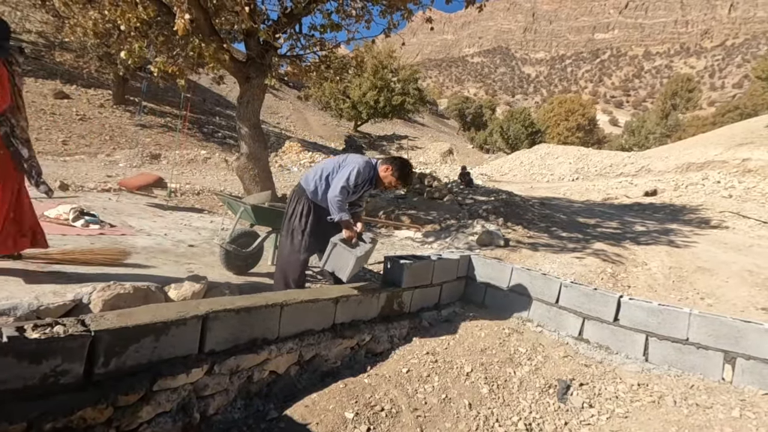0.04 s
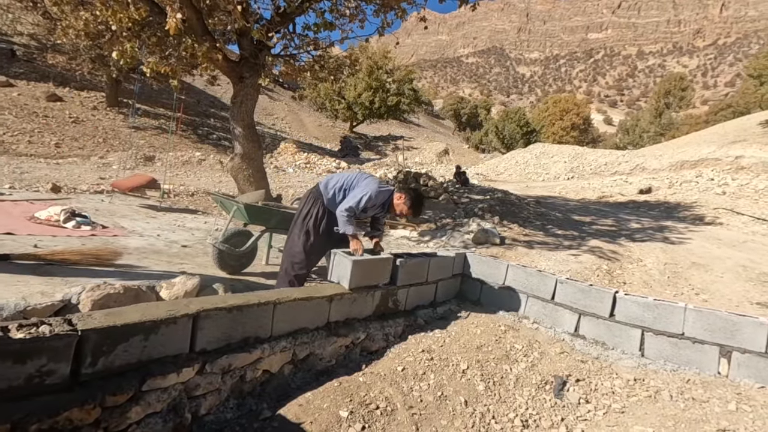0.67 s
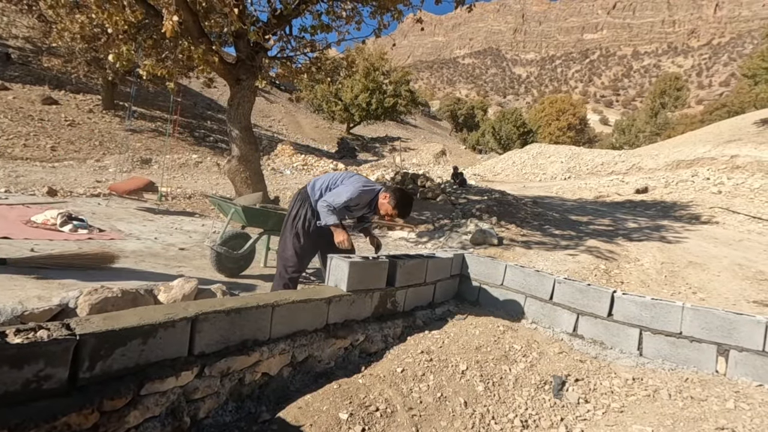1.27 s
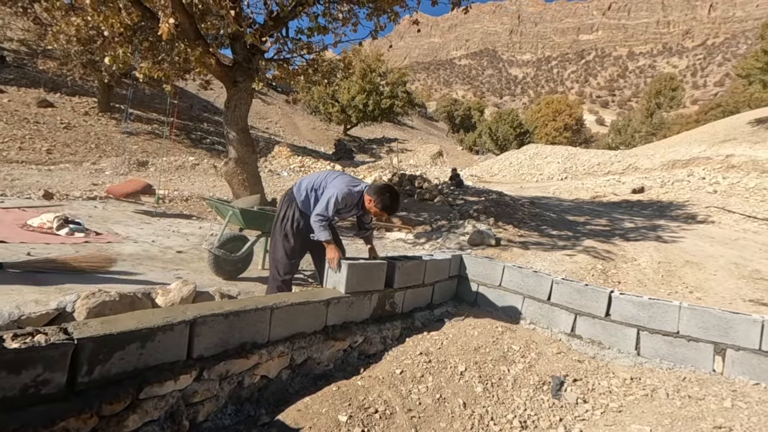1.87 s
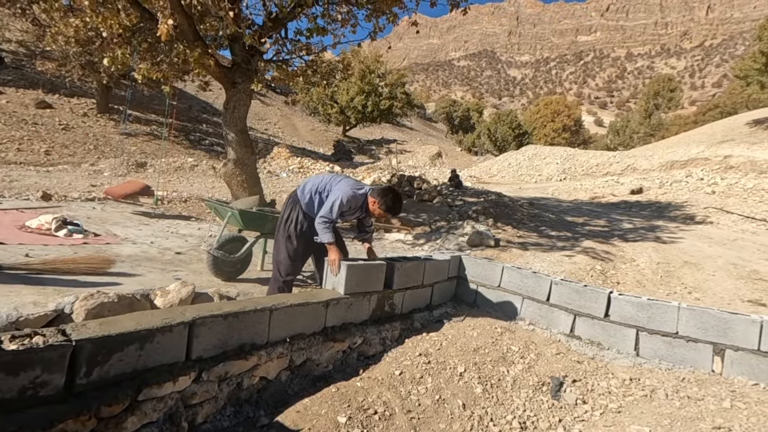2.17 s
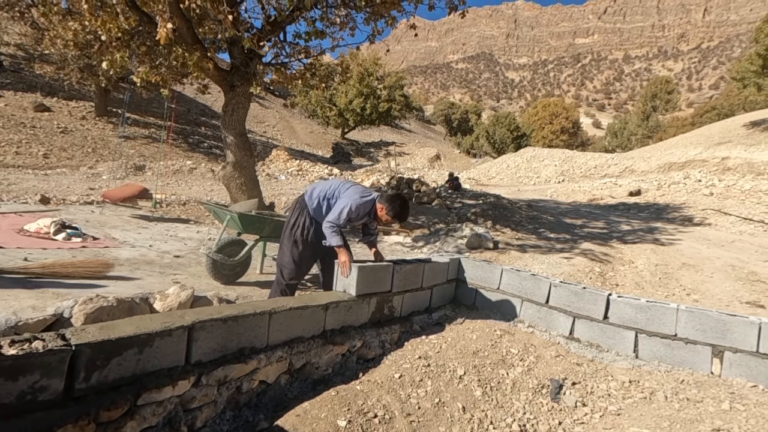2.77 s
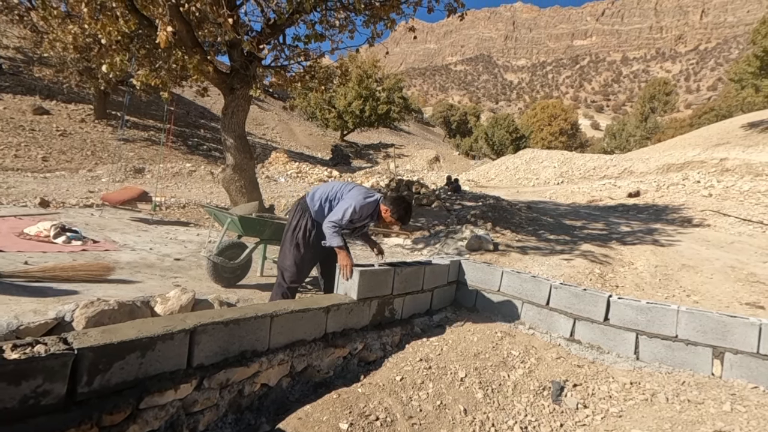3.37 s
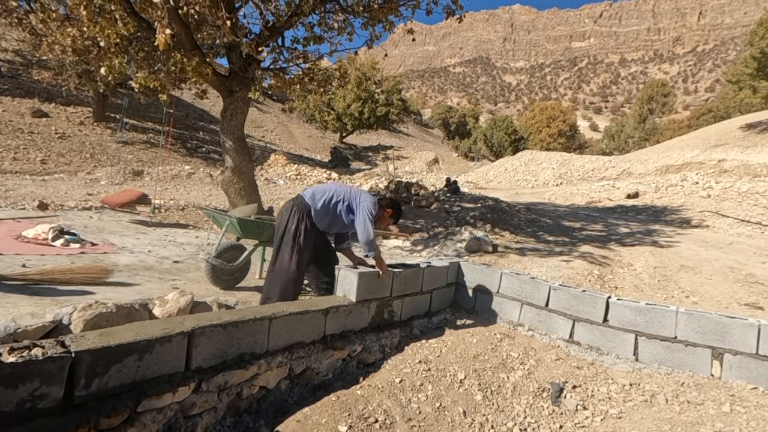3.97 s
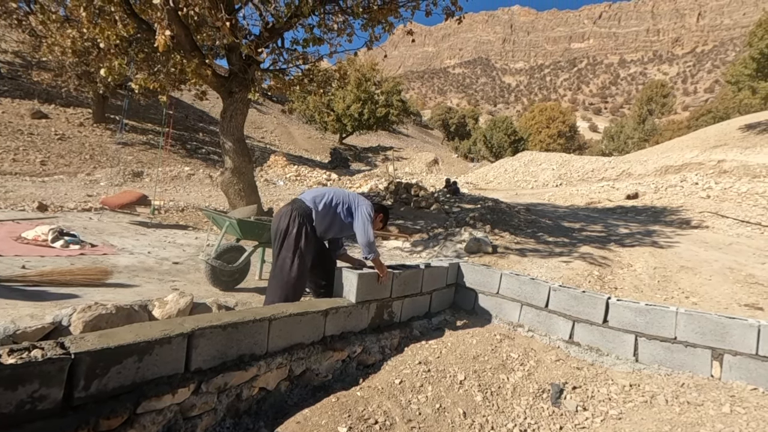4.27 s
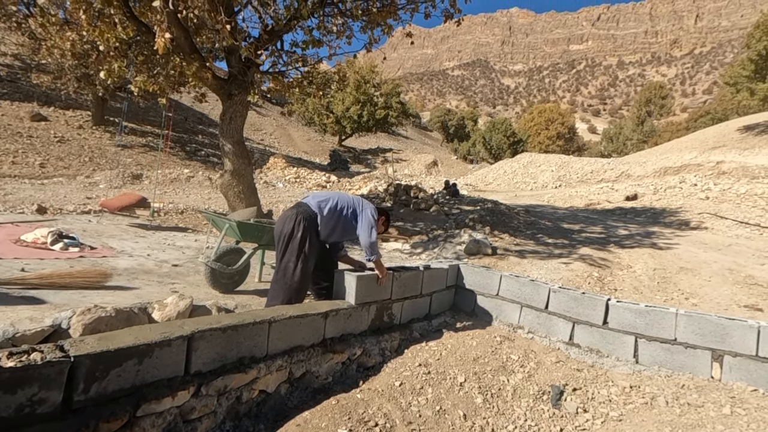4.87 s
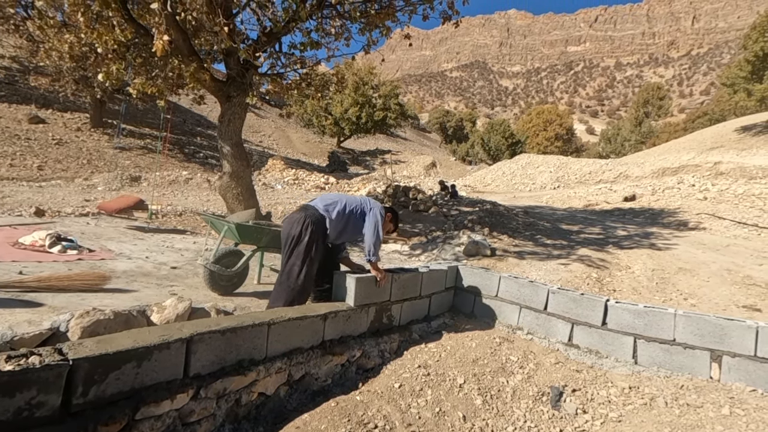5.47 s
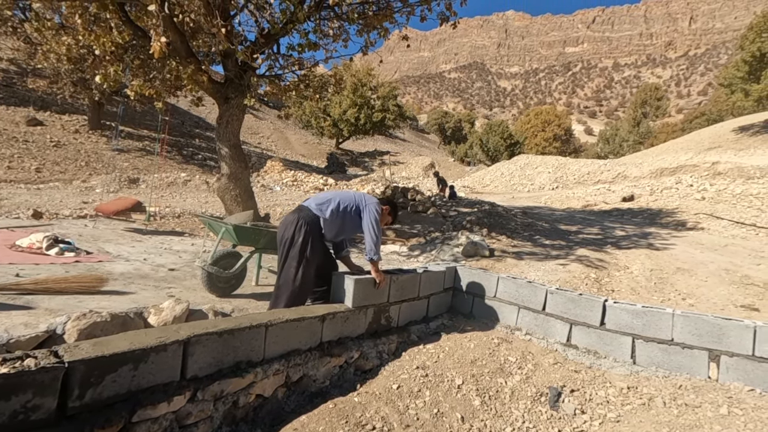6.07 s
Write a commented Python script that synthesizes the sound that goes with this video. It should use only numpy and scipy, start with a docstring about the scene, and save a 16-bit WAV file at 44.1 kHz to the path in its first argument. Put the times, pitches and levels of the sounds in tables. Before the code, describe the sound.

A hollow concrete block thuds onto wet mortar, then is shoved into line with gritty, ringing scrapes and knocks in light wind.

```python
"""Light wind on the microphone and a soft rustle come first, and almost at once a stone clacks.
A hollow concrete block thuds onto wet mortar, then is pushed into line in gritty, ringing scrapes:
it catches and slips, crushing sand, and each jolt rings its modes (the tones it naturally rings at).
Soft scuffs, small clicks of stone, hollow knocks and a dull thump come in between.
Behind it all a fine hiss fades in, dips and swells."""
import sys
import numpy as np
from scipy import signal
from scipy.fft import rfft, irfft, next_fast_len
from scipy.io import wavfile
from scipy.ndimage import uniform_filter1d, map_coordinates

SR = 44100
rng = np.random.default_rng(int(sys.argv[2]) if len(sys.argv) > 2 else 0)


def wav_out(sig):
    """Save sig, one row per channel (or a flat mono array), as 16-bit PCM at SR to the path in sys.argv[1]."""
    wavfile.write(sys.argv[1], SR, np.round(np.clip(np.atleast_2d(sig).T, -1, 1) * 32767).astype(np.int16))


N = 270333

# how strong the wind, a soft background rustle and a finer hiss are: (time [s], level [dB])
WIND_LEVELS = [(0, -54.5), (.75, -56.5), (1.7, -55), (2.15, -49), (2.9, -49.5), (3.7, -48), (4.45, -53.5),
               (5.3, -49), (6.13, -47.5)]
RUSTLE_LEVELS = [(0, -68), (.36, -71), (.55, -67.5), (1.0, -64.5), (1.6, -63.5), (2.4, -62), (2.8, -63.5),
                 (3.45, -68), (3.9, -63), (4.65, -60), (5.05, -68.5), (5.7, -62), (6.13, -69)]
HISS_LEVELS = [(0, -100), (1, -76), (2.3, -65), (3.25, -67), (3.65, -67.5), (4.3, -64.5), (4.55, -57.5),
               (4.8, -53), (5.05, -61.5), (5.25, -63), (5.55, -73), (6.13, -60.5)]
# a gust hits the microphone: (time of full force [s], hold [s], level [dB])
GUSTS = [(2.605, 0.16, -33.5)]
# tone colour of those four sounds: (frequency [Hz], level [dB])
WIND_COLOUR = [(15, -5), (30, 7), (45, -4), (70, -10.5), (120, -19.5), (190, -15.5), (300, -34),
               (500, -36.5), (900, -44)]
RUSTLE_COLOUR = [(300, 3), (650, -15.5), (1100, -3), (1700, -2), (2900, 0.5), (3300, 3), (3800, 0),
                 (7000, -5.5), (9500, -32), (14000, -10.5)]
HISS_COLOUR = [(1000, -15), (2000, -14), (3100, -9), (5800, 2.5), (7800, 0.5), (9500, -3), (14000, -4.5),
               (15500, -40)]
GUST_COLOUR = [(15, 2.5), (35, 4.5), (75, 1.5), (120, -8.5), (200, -22.5), (500, -83)]
# the stone's clack: (time [s], level [dB])
CLACKS = [(0.0243, -29.5)]
# modes of the stone, the wall at the landing, the deep thud and the later thump:
# (pitch [Hz], level [dB], t60 [s]); t60 is the time a sound takes to fade by 60 dB
STONE_MODES = [(654, -0.5, 0.017), (840, -4.5, 0.019), (1290, 0.5, 0.0086), (1850, -6, 0.012),
               (2470, -17.5, 0.017), (5470, 8.5, 0.0016)]
LANDING_MODES = [(197.4, -17.5, 0.092), (112, -21, 0.035), (259, -26, 0.071), (420, -32, 0.043),
                 (503, -34, 0.072), (1096, -42.5, 0.057), (1210, -37.5, 0.026)]
THUD_MODES = [(61.3, -5, 0.077), (33.5, -32, 0.75)]
THUMP_MODES = [(148.7, -25, 0.12), (187.6, -31, 0.2), (80, -33.5, 0.3)]
# hands and block rub: (middle [s], level [dB], pitch [Hz], width [octaves], length [s], rumble [dB])
RUBS = [(0.207, -68, 2310, .36, 0.21, -54.5), (0.885, -71, 1800, .2, 0.16, -65.5),
        (1.667, -72.5, 436, .36, 0.13, -69), (1.92, -66.5, 370, .36, 0.31, -87),
        (2.09, -68, 1860, .36, 0.25, -56), (3.051, -43.5, 3230, .2, 0.045, -60),
        (3.90, -58.5, 540, .4, 0.11, -66), (3.935, -61, 4400, 1, 0.073, -64),
        (4.84, -60, 1590, .18, .05, -56.5), (4.907, -56.5, 2000, 1.2, .09, -54),
        (4.92, -54, 1740, .22, 0.08, -54), (4.925, -62.5, 520, .2, 0.13, -67),
        (5.83, -56.5, 1800, .3, 0.12, -55)]
# mortar crunches under the block: (time [s], level [dB], t60 [s])
MORTAR_CRUNCHES = [(0.302, -40, 0.07), (0.314, -27, 0.055), (2.059, -45.5, 0.45)]
# small stones and crumbs: (time [s], level [dB], pitch [Hz], t60 [s], knock relative to click [dB])
CRUMB_CLICKS = [(0.3136, -48, 2220, 0.034, -8), (0.412, -57.5, 6500, 0.049, -20),
                (0.444, -48, 3600, 0.019, -16), (0.800, -51.5, 1730, 0.13, 1),
                (0.838, -53, 10000, 0.049, -23), (0.849, -47, 2430, 0.2, 1), (1.097, -60, 1120, 0.028, 7),
                (1.158, -55, 11000, 0.015, -20), (1.2413, -45, 2110, 0.07, -11),
                (1.505, -48, 1900, 0.025, -5), (2.455, -49, 2220, 0.084, -24),
                (2.7587, -44, 1820, 0.11, -4), (3.503, -45, 4600, 0.1, -4), (3.702, -49, 10500, 0.012, -14),
                (3.746, -48, 9150, 0.025, -22), (3.7744, -48, 8500, 0.039, -25),
                (3.870, -47.5, 1680, 0.093, -5), (3.883, -35.5, 10900, 0.13, -12),
                (5.901, -42, 10500, 0.04, -28), (5.99, -46, 11000, 0.05, -23)]
# the hollow block's modes: (pitch [Hz], width [Hz], level while loose [dB], level once seated [dB])
BLOCK_MODES = [(335, 50, -7, -10), (424, 16, 3.5, -9), (490, 32, -2.5, 2), (612, 22, -9.5, -25),
               (986, 13, 6, 6.5), (1264, 26, -3.5, -1), (1298, 20, -6, -6), (1587, 36, -7, -12),
               (1635, 32, -6.5, 3), (1672, 28, -4.5, -4), (1889, 30, -2.5, 0), (2020, 70, -12, -3),
               (2172, 45, -5, -11), (2274, 45, -6, -13), (2380, 70, -12, -18), (2691, 34, -7, -12),
               (2900, 18, -13, -14), (3210, 34, -8, 1), (3410, 60, -13, -3), (3590, 120, -16, -11),
               (3733, 24, -11, -14), (3870, 130, -17, -22), (4030, 40, -21, -8), (4500, 130, -16, -13),
               (4840, 60, -19, -20), (5660, 70, -17, -8), (6740, 80, -19, -16)]
# the block rocks: (time [s], level [dB], pitch [Hz], t60 [s], left minus right [dB])
ROCKING_KNOCKS = [(2.005, -26.5, 409, 0.067, 2), (2.031, -40, 439, 0.076, 4), (2.048, -43, 470, 0.059, 2),
                  (2.352, -38, 398, 0.048, 3), (3.004, -19.5, 316, 0.047, 1), (3.014, -26, 462, 0.043, 2),
                  (4.068, -29, 426, 0.26, 1.5), (4.205, -36, 425.3, 0.26, 1), (4.283, -35, 427, 0.086, 3)]
# the block catches and slips: (time [s], sand [dB], ring [dB], sand pitch [Hz], hold [s])
BLOCK_SLIPS = [(2.871, -52, -51, 2220, 0.018), (2.907, -41, -29, 2220, 0.011),
               (2.925, -48, -30.5, 2030, 0.0044), (2.96, -39.5, -31, 2930, 0.011),
               (2.976, -46, -25.5, 3830, 0.0043), (3.004, -42, -26.5, 2000, 0.0052),
               (3.015, -42, -25, 3900, .006), (3.035, -45, -33, 3750, 0.0083),
               (3.057, -53, -24, 1400, 0.0066), (3.081, -45.5, -32, 4200, 0.0056),
               (3.105, -49, -44, 5000, 0.0066), (3.186, -57.5, -53, 2030, 0.02),
               (3.962, -45, -39.5, 1810, 0.0047), (4.011, -54, -41, 1990, .01),
               (4.025, -40, -42, 3620, .005), (4.066, -50, -33, 1670, .006), (4.069, -33, -25, 2270, .014),
               (4.095, -55, -39, 2300, .004), (4.13, -33.5, -27.5, 2600, .004),
               (4.137, -35.5, -35, 3900, 0.0081), (4.162, -39, -46, 4960, .004),
               (4.17, -36, -23.5, 2500, 0.0083), (4.188, -40.5, -40, 3400, 0.0051),
               (4.212, -40, -27.5, 2400, 0.0036), (4.227, -43.5, -26, 2600, 0.019),
               (4.28, -48, -38, 3320, 0.0052), (4.316, -50, -42.5, 3580, 0.0097),
               (5.808, -45, -55, 1940, 0.0056), (5.824, -50.5, -62, 1800, 0.013),
               (5.84, -47.5, -48, 3000, 0.0016), (5.873, -52.5, -42, 3580, 0.011),
               (5.9, -43, -37, 3830, 0.0044), (5.963, -49, -44, 3600, .004), (5.976, -48, -43, 2400, .006),
               (5.984, -44, -34.5, 4240, 0.0096), (6.006, -51, -34, 3000, 0.01)]
# shoves: (time of full force [s], hold [s], friction [dB], weight on the wall [dB])
SHOVES = [(2.999, 0.061, -43, -34), (4.057, 0.16, -44, -37), (4.899, 0.013, -68, -47.5),
          (5.987, 0.02, -50.5, -57)]
# tone colour of mortar, crushed sand, the wall, the rubbing force, and the concrete with gaps
# between its groups of modes: (frequency [Hz], level [dB])
MORTAR_COLOUR = [(60, 6), (200, 8), (450, -8.5), (750, -15), (1100, -17), (1700, -22.5), (2700, -32),
                 (4000, -63), (9000, -47)]
SAND_COLOUR = [(300, 9), (750, -37), (1100, 14.5), (2000, -18), (3500, -14), (5000, -10), (7500, -2),
               (10000, 6.5), (14000, -3.5)]
WALL_COLOUR = [(25, -34), (60, 5), (105, 8), (165, 7), (260, -3.5), (400, -10), (520, -9.5), (700, -29),
               (1500, -77)]
FORCE_COLOUR = [(400, 1.5), (1000, 2), (3000, 2.5), (10000, 1)]
CONCRETE_COLOUR = [(750, -2.5), (1100, 2.5), (2700, -2), (3050, -6.5), (3400, 0.5), (3850, -2),
                   (4250, -4.5), (4600, -2.5)]
# how alike left and right are: (frequency [Hz], likeness [1 = the same])
AIR_LIKENESS = [(60, 0.9), (300, 0.53), (1400, 0.42), (7000, 0.29), (12000, 0.63)]
BLOCK_LIKENESS = [(300, .98), (1400, .94), (3000, .75), (7000, .5), (11000, -.1)]
# which way the sound leans: (frequency [Hz], left minus right [dB])
AIR_BALANCE = [(60, -1.5), (400, -4.5), (1500, 1.7), (7000, 2), (11000, 9)]
BLOCK_BALANCE = [(100, -1.5), (400, 0), (1100, 6), (2500, 7.5), (5000, 5), (8000, 6), (11000, 15)]
# how long the yard echoes: (frequency [Hz], t60 [s])
YARD_DECAY = [(100, 0.14), (1000, 0.32), (8000, 0.093)]
# stereo spread: (time [s], width [0 = mono])
STEREO_WIDTH = [(.9, 0.0085), (2.9, 0.81), (4.2, 0.95), (6.13, 0.98)]
# the microphone dulls the treble: (frequency [Hz], level [dB])
MIC_TREBLE = [(7700, 0), (9600, -12)]

SEATED_S = 4.6  # from here on the block sits firmly in the mortar


def amp(db):
    """Turn decibels into a gain to multiply by."""
    return 10 ** (np.asarray(db) / 20)


def unit(x):
    """Scale to an average power of 1."""
    return x / np.sqrt(np.mean(x ** 2) + 1e-20)


def along(points, hz):
    """Read a (frequency, value) table on a log frequency scale."""
    freqs, values = np.transpose(points)
    return np.interp(np.log(hz + 1), np.log(freqs + 1), values)


def curve(rows):
    """Read a (time, value) table at every sample."""
    return np.interp(np.arange(N) / SR, *np.transpose(rows))


def wobble(rate):
    """A smooth random curve through `rate` points a second."""
    return map_coordinates(rng.standard_normal(int(N * rate / SR) + 4), [np.arange(N) * rate / SR])


def swell(s, hold, rise, fall):
    """A gain that rises to 1 at time s, holds and falls; slopes are in dB per second."""
    t = np.arange(N) / SR
    return amp(-rise * np.maximum(s - t, 0) - fall * np.maximum(t - s - hold, 0))


def fade(t60, attack):
    """Half a second of a quick rise and a dying tail."""
    t = np.arange(SR // 2) / SR
    return np.exp(-np.log(1000) * t / t60) * (1 - np.exp(-t / attack))


def ring(modes, attack=0.0021):
    """Fading tones with a rounded start; a longer attack is a softer hit."""
    t = np.arange(SR // 2) / SR
    tones = sum(amp(db) * np.sin(2 * np.pi * hz * t) * fade(t60, attack) for hz, db, t60 in modes)
    return tones * (1 - np.exp(-t / attack))


def add(track, s, sound):
    """Mix a sound into a track from time s on."""
    part = track[..., round(s * SR):][..., :sound.shape[-1]]
    part += sound[..., :part.shape[-1]]


def filtered(x, response):
    """Multiply each frequency of x by response(hz)."""
    size = next_fast_len(N + SR // 2)
    return irfft(rfft(x, size) * response(np.fft.rfftfreq(size, 1 / SR)), size)[..., :N]


def noise(colour, likeness):
    """Stereo noise, made of a shared part (mid) and an opposite part (side)."""
    def gains(hz):
        angle = np.arccos(np.clip(along(likeness, hz), -1, 1)) / 2
        return amp(along(colour, hz)) * [np.cos(angle), np.sin(angle)]
    mid, side = filtered(rng.standard_normal((2, N)), gains)
    return unit(np.array([mid + side, mid - side]))


def grainy(size, centre_hz, octaves, rough_db):
    """Noise around one pitch, with a level that jumps about from grain to grain."""
    white = rng.standard_normal(size)
    jumps = map_coordinates(rng.standard_normal(size // 40 + 2), [np.arange(size) / 40])
    grains = white * amp(rough_db * jumps)
    distance = np.log2((np.fft.rfftfreq(size, 1 / SR) + 1) / centre_hz) / (octaves / 2)
    return unit(irfft(rfft(grains) / (1 + distance ** 2), size))


def placed(x, balance):
    """Lean each frequency left or right, keeping its power."""
    def gains(hz):
        pair = amp(np.outer([.5, -.5], along(balance, hz)))
        return pair / np.sqrt(np.mean(pair ** 2, axis=0))
    return filtered(x, gains)


def wind():
    """Moving air rumbles unevenly on the microphone, with one strong gust."""
    rumble = amp(curve(WIND_LEVELS) + 3.18 * wobble(8)) * noise(WIND_COLOUR, AIR_LIKENESS)
    gust = sum(amp(db) * swell(s, hold, rise=255, fall=150) for s, hold, db in GUSTS)
    return rumble + gust * noise(GUST_COLOUR, AIR_LIKENESS)


def background(patch_db=1.6):
    """A soft rustle and a finer hiss that fades in; both dip and swell, and each band of pitch wavers."""
    rustle = amp(curve(RUSTLE_LEVELS) + 1.1 * wobble(13)) * noise(RUSTLE_COLOUR, AIR_LIKENESS)
    hiss = amp(curve(HISS_LEVELS) + 0.5 * wobble(23)) * noise(HISS_COLOUR, AIR_LIKENESS)
    bands = signal.stft(rustle + hiss, nperseg=512)[2]
    patches = uniform_filter1d(rng.standard_normal(bands.shape[1:]), size=8, axis=0)
    patches = uniform_filter1d(patches, size=14, axis=1)
    return signal.istft(bands * amp(patch_db * unit(patches)), nperseg=512)[1][:, :N]


def stone_clack():
    """A hard hit on stone gives a crack of noise and a very short ring."""
    out = np.zeros(N)
    for s, db in CLACKS:
        crack = amp(-18.5) * rng.standard_normal(SR // 2) * fade(t60=0.011, attack=0.0003)
        add(out, s, amp(db) * (ring(STONE_MODES, attack=0.0003) + crack))
    return out


def scuffs(catch_db=3.5):
    """Light, uneven rubs swell and die without ringing the block, over a little rumble in the mortar."""
    out, press = np.zeros((2, N))
    t = np.arange(SR // 2) / SR
    for s, db, centre_hz, octaves, length, rumble_db in RUBS:
        start = max(s - length / 2, 0)
        stroke = np.sin(np.pi * np.minimum(t / length, 1)) ** 2
        rub = grainy(len(t), centre_hz, octaves, rough_db=-0.5)
        sand = amp(-5.5) * grainy(len(t), centre_hz, octaves=1.1, rough_db=-10)
        catching = amp(catch_db * wobble(131)[:len(t)])
        add(out, start, amp(db) * stroke * (rub + sand) * catching)
        add(press, start, amp(rumble_db) * stroke)
    return out + press * noise(MORTAR_COLOUR, AIR_LIKENESS)


def crunches():
    """Mortar squeezed under the block gives short, dull bursts of noise."""
    squeeze = np.zeros(N)
    for s, db, t60 in MORTAR_CRUNCHES:
        add(squeeze, s, amp(db) * fade(t60, attack=0.00044))
    return squeeze * noise(MORTAR_COLOUR, AIR_LIKENESS)


def landing(time_s=0.3095, weight_lag_s=0.0034):
    """The block lands, cushioned by wet mortar; its full weight follows as a thud that sways the wall."""
    out = np.zeros(N)
    add(out, time_s, ring(LANDING_MODES))
    add(out, time_s + weight_lag_s, ring(THUD_MODES))
    return out


def crumb(hz, t60):
    """A chip of mortar snaps: a short, dry burst around one pitch."""
    size = SR // 12
    tick = grainy(size, hz, octaves=1.12, rough_db=5.5) * fade(t60, attack=0.00027)[:size]
    return tick / np.abs(tick).max()


def block_modes(seated):
    """Pitch, width and level of the block's modes; once seated, it rings with another mix."""
    hz, width, loose_db, seated_db = np.transpose(BLOCK_MODES)[:, :, None]
    return hz, width, seated_db if seated else loose_db


def struck_block(seated, scatter_db=3, detune=0.002):
    """One jolt rings every mode at a new strength and a slightly new pitch; wide modes die sooner."""
    hz, width, db = block_modes(seated)
    luck, phase, drift = rng.standard_normal((3, len(BLOCK_MODES), 1))
    t = np.arange(SR // 4) / SR
    gain = amp(db + scatter_db * luck) * width
    pitch = hz * (1 + detune * drift)
    tones = gain * np.sin(2 * np.pi * (pitch * t + phase)) * np.exp(-np.pi * width * t)
    onset = 1 - np.exp(-t / 0.0054)
    return tones.sum(axis=0) * onset / np.sqrt(np.sum(gain ** 2) / 2)


def clicks(ring_db=-8.5):
    """Small stones and crumbs tick, each with a dull knock on the wall that faintly rings the block."""
    ticks, knocks = np.zeros((2, N))
    for s, db, hz, t60, knock_db in CRUMB_CLICKS:
        add(ticks, s, amp(db) * crumb(hz, t60))
        add(ticks, s, amp(db + knock_db + ring_db) * struck_block(s > SEATED_S))
        add(knocks, s, amp(db + knock_db) * fade(t60=0.057, attack=0.00044))
    return ticks + knocks * noise(MORTAR_COLOUR, AIR_LIKENESS)


def rocking():
    """The block rocks on the mortar; each hollow knock is one fading tone."""
    out = np.zeros((2, N))
    for s, db, hz, t60, side_db in ROCKING_KNOCKS:
        add(out, s, amp([[side_db / 2], [-side_db / 2]]) * ring([(hz, db, t60)]))
    return out


def crushed_sand(hz, hold, attack=0.0024, t60=0.048, trail_s=0.022):
    """One slip crushes sand: some grains shatter brightly, and loose ones skitter after."""
    size = SR // 2
    t = np.arange(size) / SR
    jerk = (1 - np.exp(-t / attack)) * np.exp(-np.log(1000) * np.maximum(t - hold, 0) / t60)
    crush = grainy(size, hz, octaves=2.14, rough_db=6.5) * jerk
    splinters = grainy(size, centre_hz=8800, octaves=1, rough_db=7) * jerk
    # every contact point sounds its own mix of the concrete's countless weak modes
    shared, own = rng.standard_normal(size), rng.standard_normal((2, size))
    weak_modes = (shared + amp(-3) * own) * fade(t60=0.05, attack=0.0002)
    weak_modes /= np.linalg.norm(weak_modes[0])
    grit = amp(-3) * crush + signal.fftconvolve(crush[None], weak_modes)[:, :size]
    for wait, luck in zip(rng.exponential(size=4), rng.standard_normal(4)):
        crumb_hz = 1.28 * hz * 2 ** (0.7 * luck)
        add(grit, trail_s * wait, amp(0.5) * np.exp(-wait / 2) * crumb(crumb_hz, t60=0.011))
    return grit + amp(-14) * splinters


def slips(shake_db=-43.5):
    """The block catches and slips; each slip crushes sand, rings the block and shakes the wall."""
    out, shake = np.zeros((2, N)), np.zeros(N)
    for s, sand_db, ring_db, sand_hz, hold in BLOCK_SLIPS:
        add(out, s, amp(sand_db) * crushed_sand(sand_hz, hold))
        add(out, s, amp(ring_db) * struck_block(s > SEATED_S))
        add(shake, s, amp(shake_db) * fade(t60=0.25, attack=0.015))
    return out + shake * noise(WALL_COLOUR, BLOCK_LIKENESS)


def rubbed_block(force, seated):
    """The block picks out the parts of a rubbing force that lie near its modes."""
    def gains(hz):
        response = sum(amp(db) * 1j * hz * width / (pitch ** 2 - hz ** 2 + 1j * hz * width)
                       for pitch, width, db in zip(*block_modes(seated)))
        return response / np.sqrt(np.mean(np.abs(response) ** 2))
    return filtered(force, gains)


def sliding():
    """Sand rolls under the shoved block: it hisses, keeps the modes ringing and rumbles in the wall."""
    # friction builds and stops quickly; the wall takes the weight sooner and lets go later
    slide = sum(amp(db) * swell(s, hold, rise=160, fall=228) for s, hold, db, _ in SHOVES)
    weight = sum(amp(db) * swell(s, hold, rise=154, fall=81) for s, hold, _, db in SHOVES)
    friction = slide * unit(amp(4.1 * wobble(900) + 2.2 * wobble(110)))  # sand breaks in bursts, clumps
    grit = amp(-7) * friction * noise(SAND_COLOUR, BLOCK_LIKENESS)
    force = (amp(1.5) * friction + amp(-16) * weight) * noise(FORCE_COLOUR, BLOCK_LIKENESS)
    seated = np.arange(N) / SR > SEATED_S
    ringing = rubbed_block(force * ~seated, False) + rubbed_block(force * seated, True)
    rumble = amp(-1.5) * weight * noise(WALL_COLOUR, BLOCK_LIKENESS)
    return grit + ringing + rumble


def thump(time_s=5.289):
    """A late bump, a little to the right, which wet mortar softens to a few low tones."""
    out = np.zeros((2, N))
    add(out, time_s, amp([[-2], [2]]) * ring(THUMP_MODES, attack=0.0035))
    return out


def yard_echo(x):
    """Ground and walls scatter the sound into a short tail."""
    hz, t, bands = signal.stft(rng.standard_normal((2, SR // 2)), SR, nperseg=256)
    decay = np.exp(-np.log(1000) * t / along(YARD_DECAY, hz)[:, None])
    tail = signal.istft(bands * decay, SR, nperseg=256)[1]
    return signal.fftconvolve(x, tail / np.linalg.norm(tail[0]), axes=1)[:, :N]


def scene():
    """The work on the wall, its faint echo and the open air around it."""
    scrapes = filtered(sliding() + slips(), lambda hz: amp(along(CONCRETE_COLOUR, hz)))
    work = placed(scrapes, BLOCK_BALANCE) + scuffs() + crunches() + stone_clack() + clicks()
    work += landing() + rocking() + thump()
    return work + amp(-11.5) * yard_echo(work) + placed(background() + wind(), AIR_BALANCE)


def record(dry, top_hz=14600):
    """The sound widens from nearly mono; the microphone dulls the treble and cuts off the very top."""
    mid = dry.mean(axis=0)
    widened = mid + curve(STEREO_WIDTH) * (dry - mid)
    return filtered(widened, lambda hz: amp(along(MIC_TREBLE, hz)) * (hz < top_hz))


dry = scene()
out = record(dry)
wav_out(out)
```